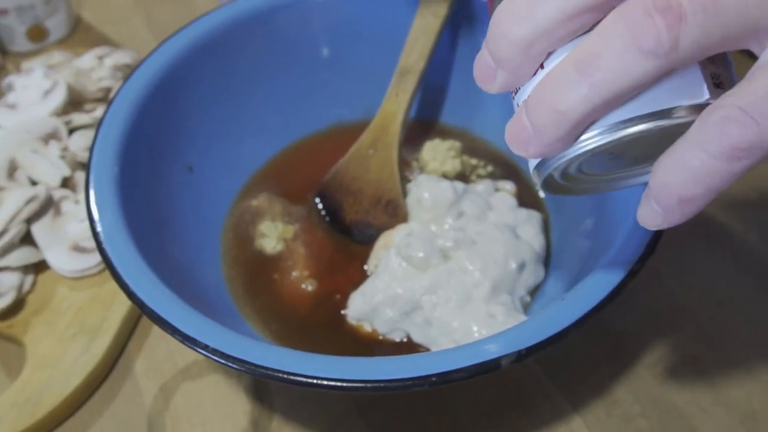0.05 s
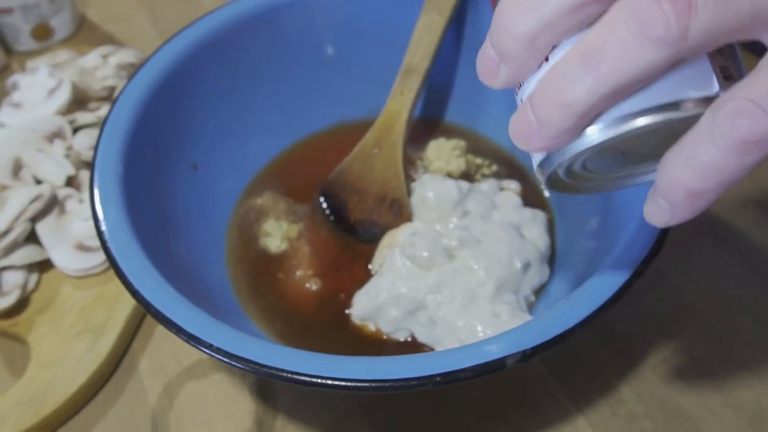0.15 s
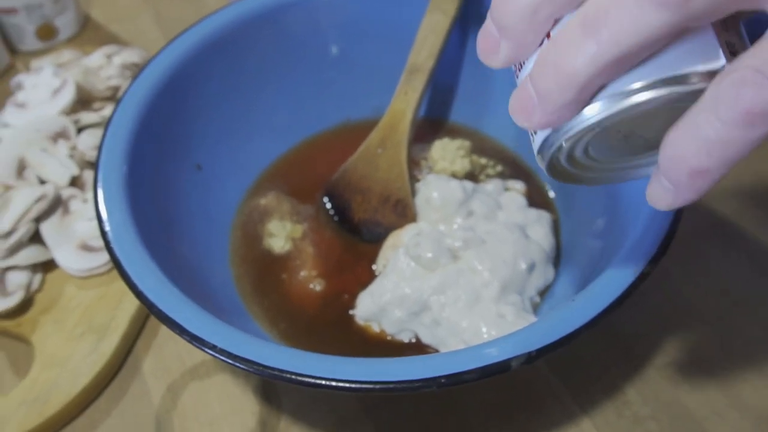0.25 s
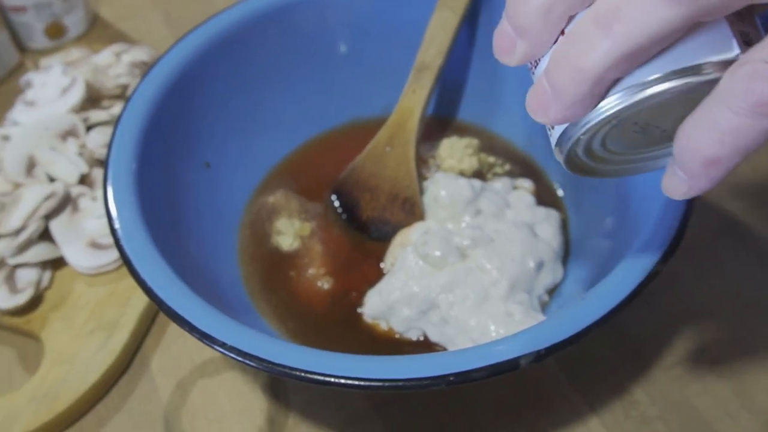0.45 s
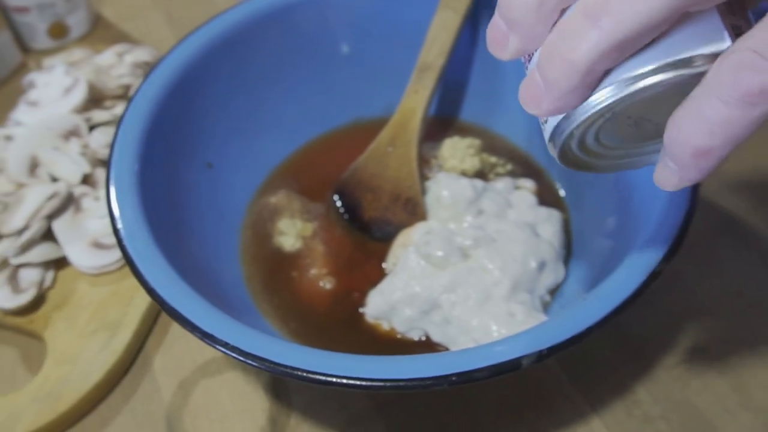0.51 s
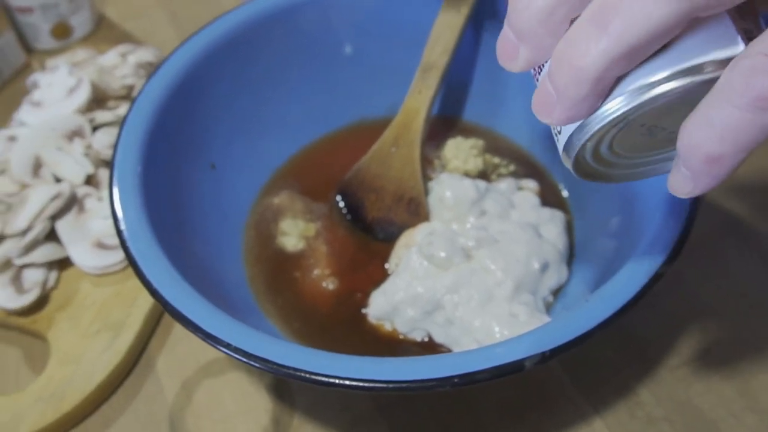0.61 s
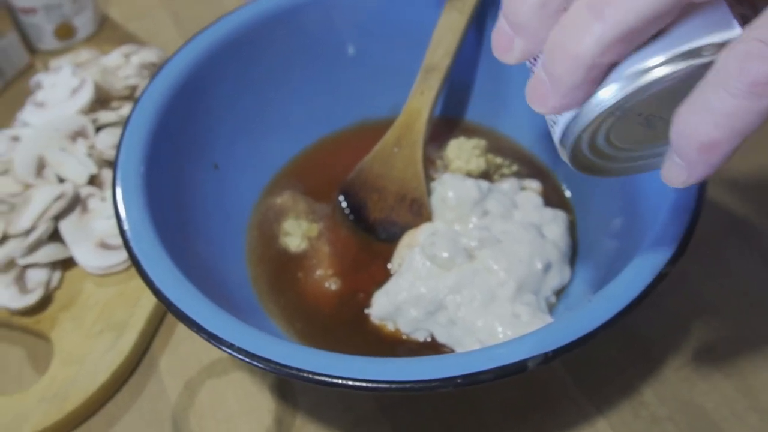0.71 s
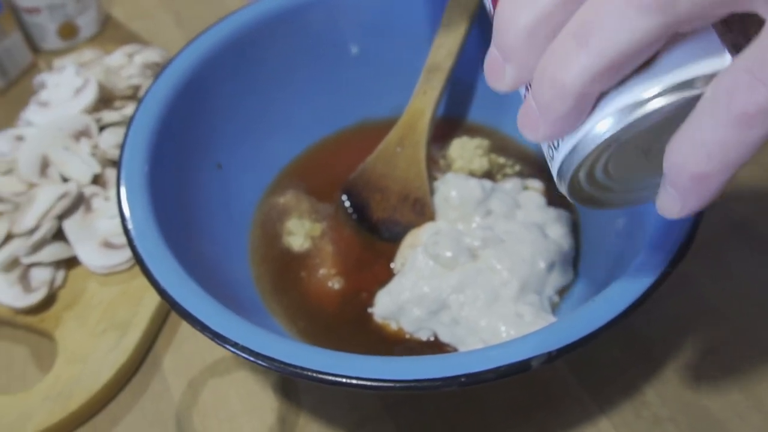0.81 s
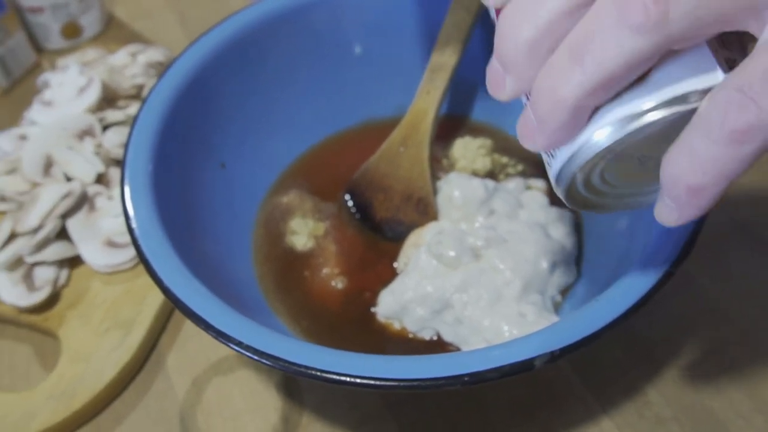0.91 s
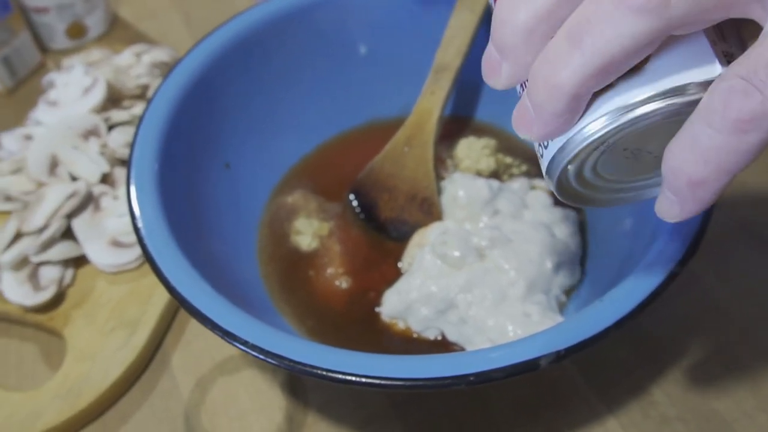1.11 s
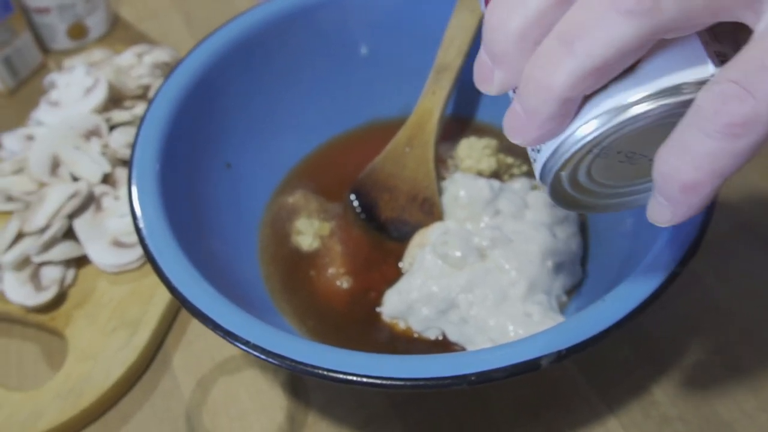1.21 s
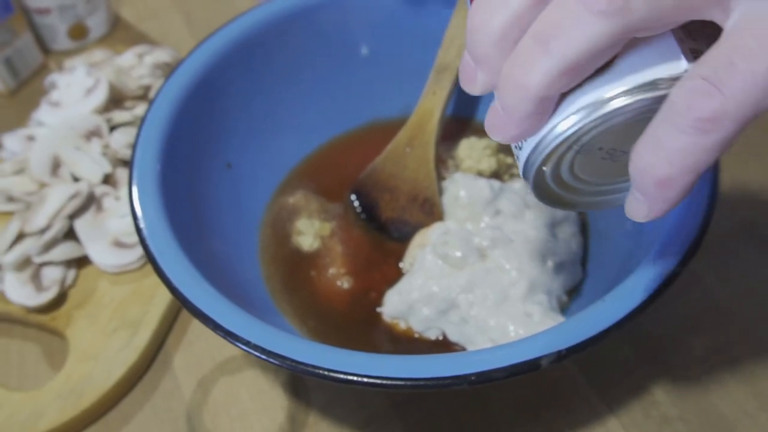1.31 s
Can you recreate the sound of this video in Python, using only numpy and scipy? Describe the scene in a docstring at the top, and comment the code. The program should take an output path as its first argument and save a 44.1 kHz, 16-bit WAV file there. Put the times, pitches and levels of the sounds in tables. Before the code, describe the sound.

A metal spoon scrapes and clinks inside a tin can, close by in a kitchen. Light rasps and small wet smacks of thick soup lead to ringing knocks around 0.3 seconds. Louder clinks with brief squeaks come at about 0.6 and 0.8 seconds. A sharp scrape follows near 1 second, then a softer, longer scoop until about 1.2 seconds, over a faint low appliance hum.

```python
"""Spooning soup from a can

A metal spoon works thick soup out of a tin can held over a bowl, close by in a kitchen. Tiny slips
rasp and stir the can, and films of soup tear with wet smacks. The spoon knocks the wall into ringing,
squeals as it slides under pressure, and ends on a long scoop. The kitchen answers with a few
reflections and a short tail, over room air and a low appliance hum."""
import sys
import numpy as np
from scipy import signal
from scipy.fft import rfft, irfft
from scipy.io import wavfile
from scipy.ndimage import uniform_filter1d

SR = 44100
rng = np.random.default_rng(int(sys.argv[2]) if len(sys.argv) > 2 else 0)


def dump(signal):
    """Clip the signal to [-1, 1] and save it as 16-bit WAV at the path in sys.argv[1]."""
    limited = np.clip(np.atleast_2d(signal).T, -1, 1)
    pcm = np.round(limited * 32767).astype(np.int16)
    wavfile.write(sys.argv[1], SR, pcm)


N = 59535
T = np.arange(N) / SR

# partials of the appliance hum: (frequency [Hz], rms level [dB])
HUM_PARTIALS = [(56.6, -54.5), (113, -66)]
# tone of the room air: (frequency [Hz], relative level [dB])
AIR_EQ = [(20, -23), (40, -21), (70, -10), (100, -13.5), (160, -4), (260, -9.5), (500, -11.5),
          (1000, -14.5), (2500, -18), (6000, -26.5), (16000, -41)]
# rasping strokes: (start [s], rise [s], hold [s], release [s], grit level [dB], can ring level [dB])
RASP_STROKES = [(-.01, 0.0041, 0.026, .04, -49.5, -38.5), (0.047, 0.017, 0.0024, .02, -46, -39.5),
                (0.161, 0.034, 0.011, .01, -48, -45), (0.199, 0.0048, 0.023, .014, -31.5, -36.5),
                (0.218, 0.057, 0.037, .03, -37, -49), (0.309, 0.026, 0.008, .015, -26.5, -30),
                (0.565, 0.019, 0.033, .01, -24.5, -36), (0.614, 0.026, 0.057, .05, -37, -42.5),
                (0.738, 0.0054, .004, 0.014, -35, -38), (0.752, 0.031, 0.016, .01, -34.5, -67),
                (0.826, 0.018, 0.052, .08, -40.5, -37.5), (0.964, 0.019, 0.011, .01, -22.5, -29),
                (1.034, 0.022, 0.011, .04, -43, -39), (1.096, 0.055, 0.055, 0.0063, -39, -39)]
# tone of the rasp: (frequency [Hz], relative level [dB])
GRIT_EQ = [(80, -57), (200, -26), (450, -20), (800, -6), (1600, -5.5), (2300, 1), (3400, 3), (5200, -6.5),
           (7500, -17.5), (11000, -26), (16000, -45)]
# modes of the can, before contact reshapes them: (frequency [Hz], level [dB], t60 [s])
CAN_MODES = [(741, -10.5, 0.16), (1123, -12.5, .12), (1262, -15, 0.02), (1020, -12.5, 0.011),
             (2077, -7.5, 0.17), (2159, -9, .1), (2620, -24, 0.054), (2696, 1, 0.07), (2764, -5.5, 0.13),
             (3190, -23.5, 0.27), (3476, -7.5, 0.068), (3740, -9.5, 0.063), (4205, -10, 0.057),
             (4090, -21.5, 0.017)]
# soup letting go of the metal: (time [s], level before EQ [dB], t60 [s])
SMACK_HITS = [(.1440, -25, .04), (0.2023, -51, 0.042), (0.224, -14, 0.0067), (.2650, -21, 0.022),
              (0.8078, -13.5, 0.024)]
# tone of a smack: (frequency [Hz], gain [dB])
SMACK_EQ = [(150, -9), (700, -2.5), (1500, -9.5), (3000, 11), (4600, -3), (6300, 2.5), (9000, -10.5),
            (16000, -25)]
# spoon on can: (time [s], ring level [dB], lowest mode gain [dB], next three modes gain [dB],
# singing pair gain [dB], relative tick level [dB], ring length [factor], pitch [factor])
KNOCK_HITS = [(0.2692, -17, 5.5, 14, 2, -8.5, 0.74, 1.045), (0.2923, -28, 8, -13, 7, -13.5, .5, 1.0),
              (0.3621, -8, 1, 4, -2.5, -11, 0.56, .995), (0.5548, -16.5, -2.5, -19, -26, -12, 0.27, 1.13),
              (0.5721, -6.5, 1.5, 11, 6.5, -8, 0.44, 1.085), (0.5922, -22, 5, -12, -3, -6, 0.33, 0.76),
              (0.6117, -1.5, 0.5, -2, 2, -2.5, 0.73, 1.012), (0.6957, -22, -4, -19, -22, -23, 0.2, 1.0),
              (.7360, -15.5, -39, 6, 2, -13, 0.26, 1.0), (.7903, -9, -0.5, 17, 8, 4, 0.61, 1.035),
              (.8142, 1, -1.5, 0.5, 2.5, 3.5, 0.7, 1.003), (.9510, -24.5, -12, 9.5, 3, -35, 0.42, 0.99),
              (.9950, -23.5, 13, 19.5, -17, -30, 0.7, 1), (1.0485, -34.5, 17, 7, -22, -37, 0.5, 0.72)]
# tone of the tick, from dense, fast-dying modes of spoon and rim: (frequency [Hz], gain [dB])
TICK_EQ = [(80, -65), (300, -21), (600, -10), (1200, -3.5), (1650, -7), (2600, 0), (4300, 2), (6000, -5.5),
           (9500, -12), (13000, -24), (16500, -28)]
# slides under pressure: (start [s], length [s], level [dB], wall stiffening at start, at end [ratio])
SQUEAL_SLIDES = [(.270, 0.022, -22, 0.035, -0.0076), (0.319, 0.031, -18.5, 0.0093, -0.0035),
                 (.571, .043, -11, 0.0797, -0.032), (.790, 0.02, -17.5, 0.051, 0.034)]
# modes of the pressed wall: (frequency [Hz], level [dB], response to stiffening [factor])
PRESSED_MODES = [(1142.3, -7, 0.3), (2325, -3.5, 1.97), (2808, 3, 0.971), (3182, -11.5, 0.65),
                 (4250, -12, 1.2), (5720, -19.5, 0.648)]
# the last long scoop: (start [s], rise [s], hold [s], release [s])
SCOOP_STROKE = (1.08, 0.0674, 0.062, 0.0088)
# resonances that move as the spoon climbs the wall: (from [Hz], to [Hz], width [Hz], level [dB])
SCOOP_GLIDES = [(1100, 1122, 23, -43.5), (1600, 1660, 66, -44.5), (1996, 2310, 40, -43),
                (3630, 3400, 140, -41.5), (4450, 5280, 360, -45)]
# reflections off bowl, counter and walls: (left delay [s], right delay [s], gain [factor])
REFLECTIONS = [(.0011, 0.00091, 0.31), (.0034, .00345, -0.055), (.0095, 0.011, 0.046), (.0189, .019, 0.19),
               (.0243, .0242, 0.11), (.0352, .0353, 0.11)]
# the kitchen's reverb tail: (frequency [Hz], t60 [s], level [dB])
TAIL_BANDS = [(189, 0.53, -20), (424, 0.13, 3.5), (810, 0.31, -11), (1400, 0.47, -8.5), (2600, 0.35, -9.5),
              (4500, 0.39, -12), (8900, 0.29, -11), (16000, 0.16, -3.5)]
# stereo width of the tail: (frequency [Hz], side gain [dB])
TAIL_SIDE_EQ = [(200, -5), (600, -10), (1200, -8), (2600, -5.5), (5000, 3), (12000, 5.5)]


def amp(db):
    """Decibels to gain."""
    return 10 ** (np.asarray(db) / 20)


def unit_rms(x):
    """Scales to an rms of 1."""
    return x / np.sqrt(np.mean(x ** 2) + 1e-20)


def eq(x, curve):
    """Minimum-phase EQ along a curve of (frequency [Hz], gain [dB])."""
    size = 2 * x.shape[-1]
    hz, db = np.transpose(curve)
    log_hz = np.log(np.fft.rfftfreq(size, 1 / SR) + 1)
    cepstrum = irfft(np.log(amp(np.interp(log_hz, np.log(hz), db))))
    cepstrum[1:size // 2] *= 2
    cepstrum[size // 2 + 1:] = 0
    return irfft(rfft(x, size) * np.exp(rfft(cepstrum)))[..., :size // 2]


def decay(t, t60):
    """Envelope that falls 60 dB in t60 seconds."""
    return np.exp(-np.log(1000) * t / max(t60, 1e-3))


def place(mix, start, sound):
    """Mixes a sound in at a start time in seconds."""
    part = mix[max(round(start * SR), 0):][:len(sound)]
    part += sound[:len(part)]


def stereo_noise(correlation):
    """Left and right white noise, partly alike."""
    mid, side = rng.standard_normal((2, N))
    return np.sqrt((1 + correlation) / 2) * mid + np.sqrt((1 - correlation) / 2) * np.array([side, -side])


def room_tone():
    """A steady bed of appliance hum and soft room air."""
    hum = sum(amp(db) * np.sqrt(2) * np.sin(2 * np.pi * (hz * T + rng.random()))
              for hz, db in HUM_PARTIALS)
    air = amp(-52.5) * unit_rms(eq(stereo_noise(correlation=0.78), AIR_EQ))
    return hum + air


def friction(slips_per_s=4500, spread_db=4):
    """A dense crackle of tiny slips of uneven size."""
    slips = (rng.random(N) < slips_per_s / SR) * rng.choice([-1, 1], N)
    size_db = spread_db * np.minimum(rng.exponential(1, N), np.pi)
    return unit_rms(slips * amp(size_db))


def stroke_force(start, rise, hold, release):
    """The push of one stroke: ramp up, hold, ramp down."""
    return np.interp(T, start + np.cumsum([0, rise, hold, release]), [0, 1, 1, 0])


def can_ring(lowest_db, next_db, pair_db, length, pitch):
    """The can rings: the contact point weights its modes, and pressure retunes all but the lowest."""
    t = T[:SR // 2]
    contact_db = [lowest_db] + [next_db] * 3 + [0] * 3 + [pair_db] * 2 + [0] * 5
    ring = np.zeros(len(t))
    for k, (hz, db, t60) in enumerate(CAN_MODES):
        polarity = (-1) ** (k // 2)
        tone = polarity * np.sin(2 * np.pi * hz * (pitch if k else 1) * t)
        ring += amp(db + contact_db[k]) * decay(t, t60 * length) * tone
    return ring


def rasps():
    """The slips under each stroke sound as grit and stir the can."""
    slips, grit_level, ring_level = friction(), np.zeros(N), np.zeros(N)
    for *timing, grit_db, ring_db in RASP_STROKES:
        force = stroke_force(*timing)
        grit_level += amp(grit_db) * force
        ring_level += amp(ring_db) * force
    grit = grit_level * unit_rms(eq(slips, GRIT_EQ))
    body = can_ring(lowest_db=7.5, next_db=7.5, pair_db=0, length=0.33, pitch=0.97)
    return grit + signal.fftconvolve(ring_level * slips, body / np.linalg.norm(body))[:N]


def smacks(attack_s=0.00047):
    """Films of soup tear in short, bright, wet bursts."""
    bursts, t = np.zeros(N), T[:SR // 10]
    for start, db, t60 in SMACK_HITS:
        envelope = np.minimum(t / attack_s, 1) * decay(t, t60)
        place(bursts, start, amp(db) * envelope * rng.standard_normal(len(t)))
    return eq(bursts, SMACK_EQ)


def knocks(tick_gain_db=1.02, low_cut_hz=413):
    """The spoon hits the wall: a bright tick on top of the ring of the can."""
    rings, ticks, t = np.zeros(N), np.zeros(N), T[:SR // 8]
    tick_envelope = decay(t, t60=0.013) + amp(-14) * decay(t, t60=0.087)
    for start, ring_db, lowest_db, next_db, pair_db, tick_db, length, pitch in KNOCK_HITS:
        place(rings, start, amp(ring_db) * can_ring(lowest_db, next_db, pair_db, length, pitch))
        place(ticks, start, amp(tick_db) * tick_envelope * rng.choice([-1, 1], len(t)))
    # the low cut keeps the start of each ring free of thump
    low_cut = signal.butter(3, low_cut_hz, "high", fs=SR, output="sos")
    return signal.sosfilt(low_cut, rings) + amp(tick_gain_db) * eq(ticks, TICK_EQ)


def wobble(size, hz):
    """Smooth random modulation with an rms near 1."""
    low_pass = signal.butter(2, hz, fs=SR, output="sos")
    return unit_rms(signal.sosfilt(low_pass, rng.standard_normal(N)))[-size:]


def squeals(chatter_hz=259.26, roughness=0.43, pitch_jitter=0.011):
    """Stick and slip keep the pressed wall singing; its modes sink as the spoon slides on."""
    out = np.zeros(N)
    for start, length, db, stiff_start, stiff_end in SQUEAL_SLIDES:
        progress = np.linspace(0, 1, round(length * SR))
        stiffening = stiff_start + (stiff_end - stiff_start) * progress
        swell = abs(np.sin(np.pi * progress)) ** 0.97
        chatter = 1 + roughness * wobble(len(progress), chatter_hz)
        for hz, mode_db, response in PRESSED_MODES:
            glide_hz = hz * (1 + response * stiffening + pitch_jitter * wobble(len(progress), chatter_hz))
            tone = np.sin(2 * np.pi * np.cumsum(glide_hz) / SR)
            place(out, start, amp(db + mode_db) * swell * chatter * tone)
    return out


def scoop():
    """A long drag through gliding resonances, ending as the spoon leaves the rim."""
    slips, out = friction(), np.zeros(N)
    for from_hz, to_hz, width_hz, db in SCOOP_GLIDES:
        glide_hz = np.interp(T, [SCOOP_STROKE[0], sum(SCOOP_STROKE)], [from_hz, to_hz])
        carrier = np.exp(2j * np.pi * np.cumsum(glide_hz) / SR)
        pole = np.exp(-np.pi * width_hz / SR)
        # swept band-pass: shift down, smooth, shift back up
        resonance = carrier * signal.lfilter([1 - pole], [1, -pole], slips / carrier)
        out += amp(db) * unit_rms(resonance.imag)
    return out * stroke_force(*SCOOP_STROKE)


def kitchen_tail(fade_in_s=0.0053):
    """The room's diffuse response: stereo noise, each band dying at its own rate."""
    noise = stereo_noise(correlation=0.58)[:, :SR // 2]
    mid = noise.mean(0)
    hz, t, spectrum = signal.stft(mid + eq(noise - mid, TAIL_SIDE_EQ), SR, nperseg=256)
    band_hz, t60, db = np.transpose(TAIL_BANDS)
    t60, db = (np.interp(np.log(hz + 1), np.log(band_hz), column)[:, None] for column in (t60, db))
    rate = np.log(1000) / t60
    envelope = amp(db) * np.sqrt(2 * rate / SR) * np.exp(-rate * t)
    tail = signal.istft(spectrum * envelope, SR, nperseg=256)[1]
    return tail * np.minimum(T[:tail.shape[1]] / fade_in_s, 1) ** 2


def kitchen(direct):
    """Direct sound, a few near reflections and a short tail."""
    out = np.array([direct, direct])
    for left_s, right_s, gain in REFLECTIONS:
        place(out[0], left_s, gain * direct)
        place(out[1], right_s, gain * direct)
    return out + signal.fftconvolve(direct[None], kitchen_tail(), axes=1)[:, :N]


def scene():
    """Spoon and can in the kitchen, panned a touch right, over the room tone."""
    spooning = knocks() + squeals() + rasps() + scoop() + smacks()
    pan = amp([[-0.35], [0.35]])
    return kitchen(spooning) * pan + room_tone()


def record(dry):
    """A limiter ducks the hard knocks and recovers while they ring; then a soft clip and a high cut."""
    threshold_db, slope, attack_s, release_db_per_s = -6, 0.78, 0.0036, 316
    high_cut_hz = 16300
    peak_db = 20 * np.log10(abs(dry).max(0) + 1e-9)
    held_db = np.maximum.accumulate(peak_db + release_db_per_s * T) - release_db_per_s * T
    duck_db = uniform_filter1d(slope * np.maximum(held_db - threshold_db, 0), round(attack_s * SR))
    limited = dry * amp(-duck_db)
    rounded = limited / (1 + limited ** 12) ** (1 / 12)
    high_cut = signal.firwin(255, high_cut_hz, window=("kaiser", 9), fs=SR)
    return signal.oaconvolve(rounded, high_cut[None], "same")


dry = scene()
out = record(dry)
dump(out)
```